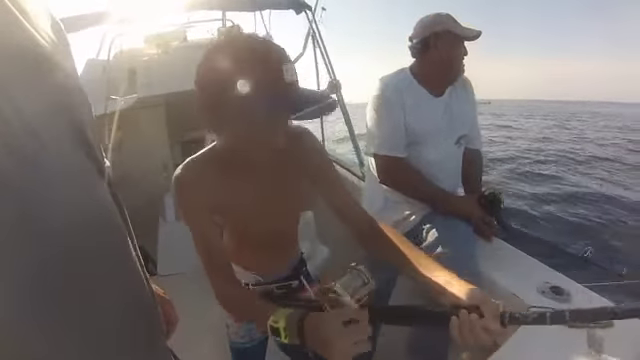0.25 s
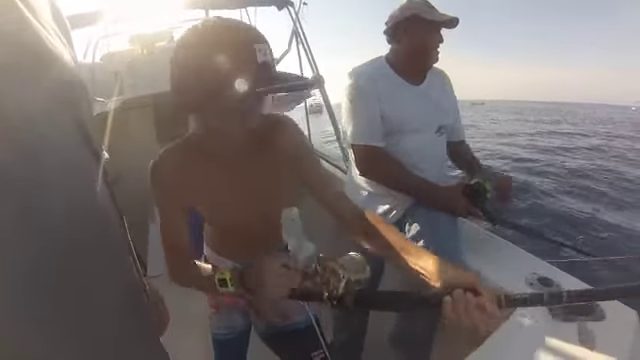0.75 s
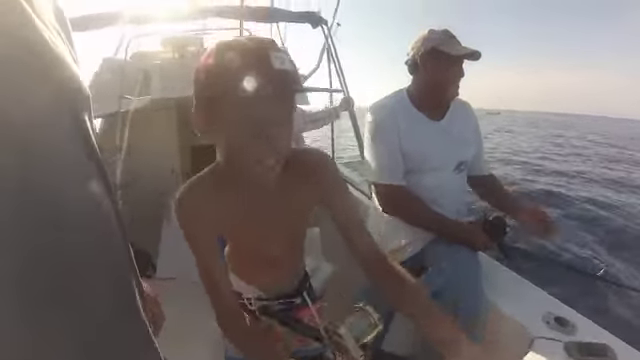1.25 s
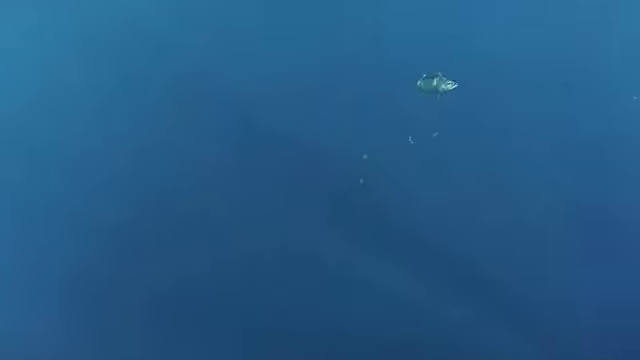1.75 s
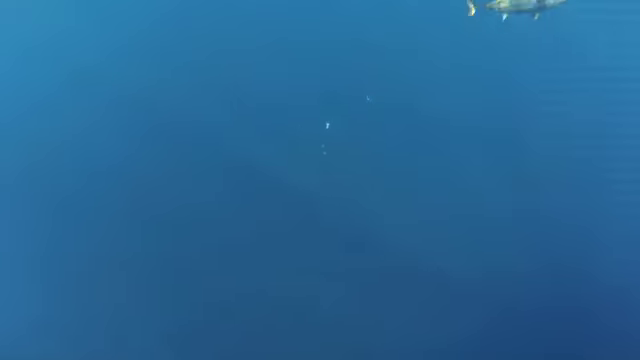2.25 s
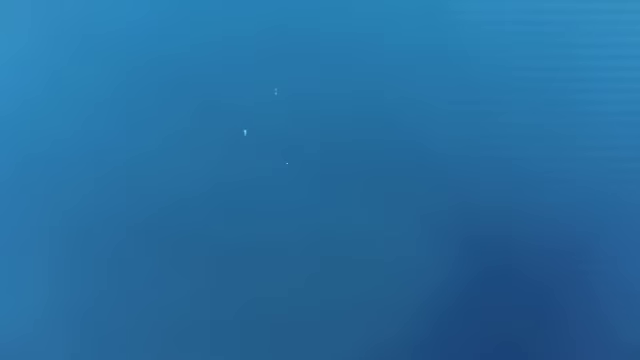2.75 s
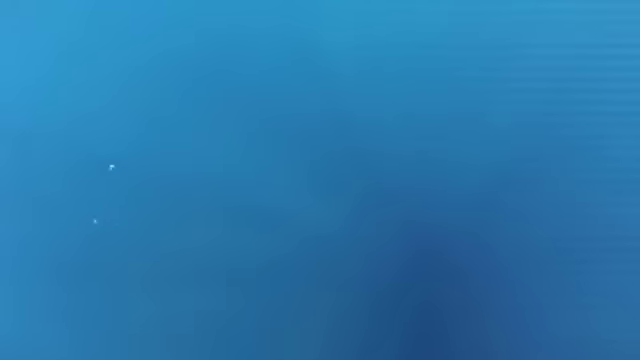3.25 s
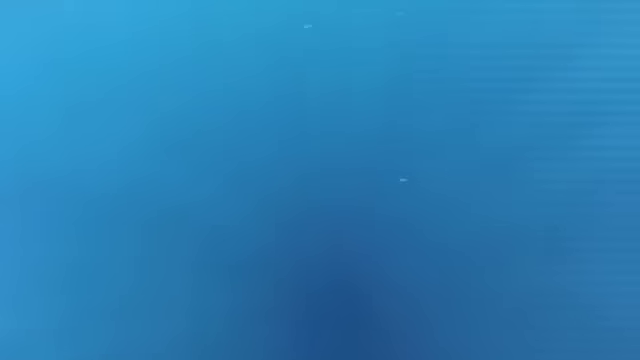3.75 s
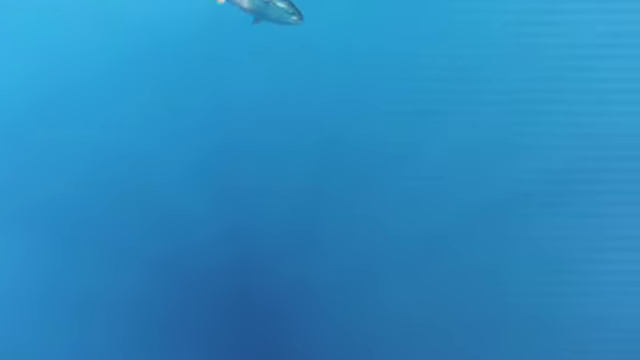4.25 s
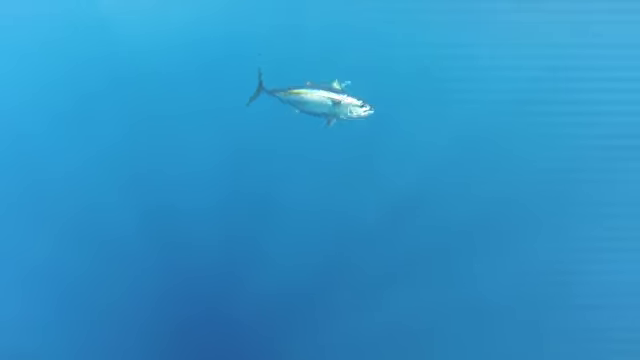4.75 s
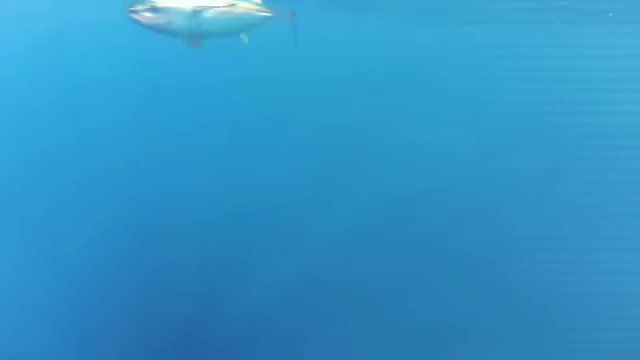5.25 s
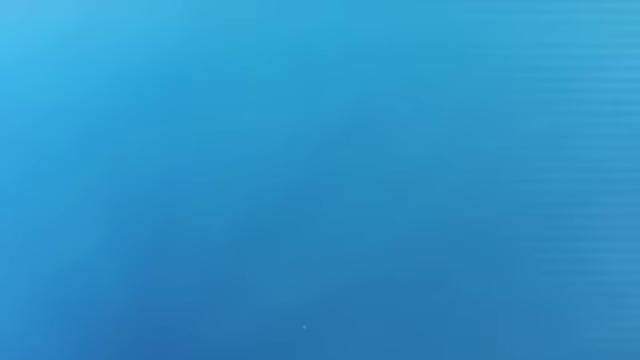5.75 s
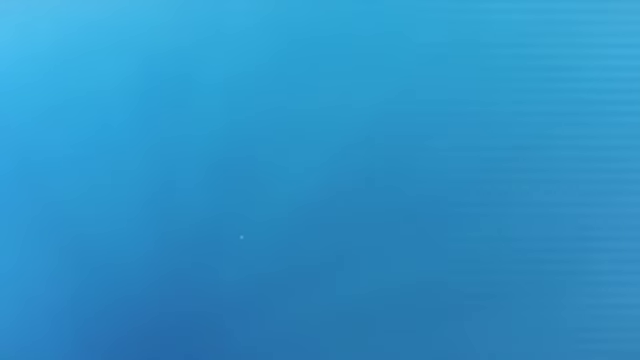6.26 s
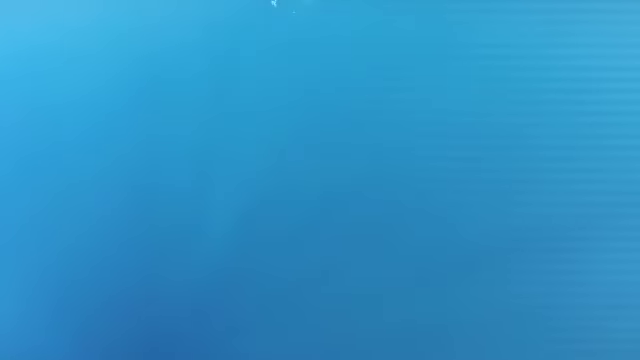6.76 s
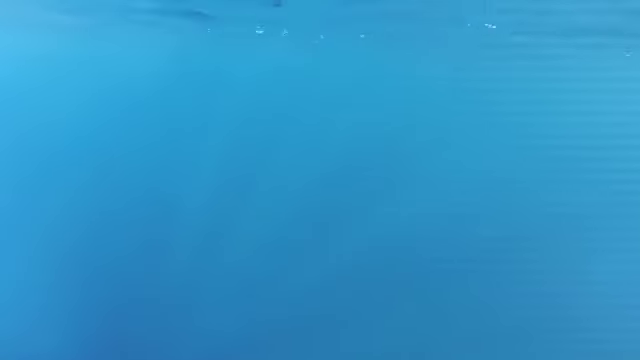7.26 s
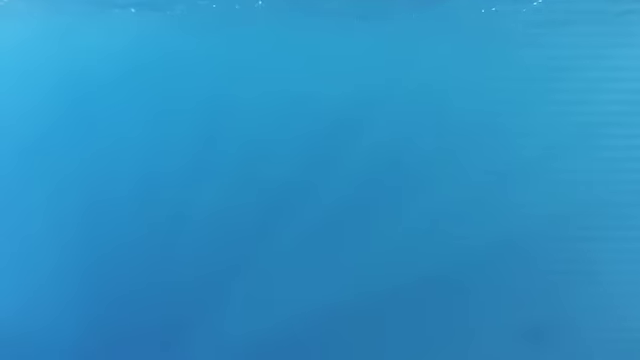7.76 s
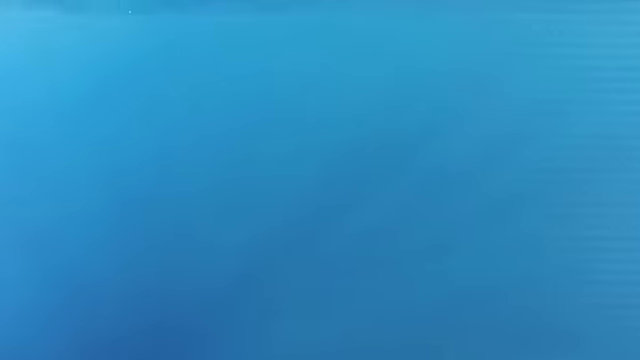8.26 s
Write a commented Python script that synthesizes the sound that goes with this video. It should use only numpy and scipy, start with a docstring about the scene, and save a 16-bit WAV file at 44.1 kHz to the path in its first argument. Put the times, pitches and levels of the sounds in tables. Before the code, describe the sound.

Underwater, a boat diesel clatters steadily through the hull while water swirls, bubbles fizz and two loud knocks jolt the camera.

```python
"""An idling diesel knocks through the hull of a fishing boat, heard by a camera in a sealed housing.
On deck the housing passes only a dull rumble, hiss and ticking; then the camera goes under water.
Blows repeated every engine cycle excite hull resonances and fade as the camera nears the surface.
Shaped noise swirls and sways past, gliding sines gurgle, and tiny pings make fizzing bubbles.
Short noise snaps click at the housing, and two bumps, of several contacts, ring the shell and mount."""
import sys
import numpy as np
from scipy import signal
from scipy.fft import rfft, irfft
from scipy.io import wavfile
from scipy.ndimage import uniform_filter1d

SR = 44100
rng = np.random.default_rng(int(sys.argv[2]) if len(sys.argv) > 2 else 0)


def to_wav(sig):
    """Store sig (one row per channel, or 1-D mono) as 16-bit WAV at the path in sys.argv[1].

    Samples outside -1..1 are clipped; the rate is SR.
    """
    pcm = np.clip(np.atleast_2d(sig), -1, 1) * 32767
    pcm = np.round(pcm).astype(np.int16)
    wavfile.write(sys.argv[1], SR, pcm.T)  # frames by channels


N = 375732
TIME = np.arange(N) / SR  # s

# the muffled deck, relative spectra: hz, level_db (per Hz)
DECK_RUMBLE_COLOUR = [(10, -27), (30, 3.5), (50, -2.5), (95, -20), (135, -19), (260, -22.5), (320, -30),
                      (540, -28), (750, -38), (1300, -31.5), (1900, -44.5), (2430, -35.5), (3100, -52),
                      (6000, -89)]
DECK_HISS_COLOUR = [(1000, 3), (3800, -0.5), (7400, -2.5), (8800, -6.5), (12600, -8), (13400, -25),
                    (15000, -35)]

# water noises, relative spectra: hz, level_db (per Hz)
RUSH_COLOUR = [(30, -5.5), (70, -3), (130, 1), (200, -2.5), (330, -6.5), (450, 2), (600, -4), (800, -10.5),
               (1050, -28.5), (2400, -33), (3200, -52.5), (6000, -65.5), (12000, -80.5)]
WASH_COLOUR = [(100, -23.5), (200, -10), (250, -3), (330, -1.5), (450, 3.5), (600, -2.5), (800, -10.5),
               (1050, -29), (2400, -34), (4000, -59.5), (12000, -84.5)]
SWAY_COLOUR = [(5, -18.5), (15, -6), (26, 2.5), (42, -6.5), (65, -15.5), (110, -32), (300, -86)]
HISS_COLOUR = [(100, -1.5), (3600, 5.5), (4800, -2.5), (6000, -7), (6700, 1.5), (7600, -5), (9500, -3),
               (12600, -2), (13200, -17), (15000, -20.5)]
# swirls of water past the housing: peak_s, deep_rush_db, hollow_churn_db, half_length_s
SWIRLS = [(1.898, -43.5, -44, .26), (2.72, -39.5, -49.5, 0.3), (3.6, -57.5, -48.5, 0.68),
          (6.268, -50, -50.5, 0.2), (7.8, -54, -67, 0.14)]
# slow surges of pressure from passing waves: peak_s, peak_db, half_length_s
SURGES = [(1.75, -44, .15), (3.95, -38, 0.078), (4.48, -38.5, .12), (5.84, -37, .1), (6.5, -44, 0.21)]
# larger bubbles gurgling off the housing: start_s, peak_db, pitch_hz, rise_hz_per_s
GURGLES = [(1.54, -29, 593, 300), (1.615, -34.5, 423, 806), (1.70, -28.5, 588, -200),
           (1.78, -34, 689, 4004), (1.885, -32, 392, 398), (2.108, -39.5, 277, 502.5),
           (2.72, -33.5, 175, -1200), (2.825, -44, 860, 4504), (2.865, -36.5, 203, 2500),
           (6.172, -49, 924, 1504)]
# clouds of tiny bubbles drifting by: peak_s, peak_db, half_length_s
CLOUDS = [(2.03, -79.5, .08), (2.33, -80, 0.098), (4.3, -84.5, .15), (5.45, -80.5, 0.22), (6.1, -78, 0.17),
          (7.9, -82.5, 0.26)]
# small clicks and bubbles at the housing: start_s, peak_db, centre_hz, width_hz
CLICKS = [(1.627, -53, 6000, 1500), (3.025, -42.5, 8600, 3500), (3.195, -41.5, 6400, 2200),
          (3.29, -41.5, 7100, 7000), (3.29, -41, 4180, 700), (3.6382, -46.5, 12300, 1800),
          (4.3047, -54.5, 7200, 2500), (4.319, -51, 3850, 500), (6.192, -50, 6560, 2500),
          (7.3901, -36, 2750, 303), (7.77, -50, 3900, 600)]

# contacts on the camera: start_s, thud_db, clack_peak_db, brightness_hz, pitch_factor (on the mount)
KNOCKS = [(2.9444, -36, 2.5, 1100, 1.8), (2.9477, -15.5, 1.5, 895, 0.97), (3.2854, -24, -6.5, 390, 2.6),
          (3.2867, -14, -13.5, 260, 0.89), (3.347, -38, -46, 200, 1.3)]
# ring of camera and pole, before each contact's pitch factor: pitch_hz, level_db, t60_s
MOUNT = [(22.4, -15.5, 0.58), (43.7, -8.5, 0.47), (102.4, 8, 0.15), (169, -10, 0.11), (217, -12, 0.25),
         (277, -35, 0.04)]
# resonances of the shell when struck: centre_hz, width_hz, relative level_db
SHELL_MODES = [(90, 190, 3), (205, 57, 9.0), (553, 250, 4.5), (933, 350, -2.5), (1530, 980, -11.5),
               (2500, 710, -22), (6000, 4600, -39)]

# resonances of the loose, buzzing housing: centre_hz, width_hz, relative level_db
BUZZ_MODES = [(2353, 150, 2), (2581, 76, -4), (3670, 330, -17)]
# blows of pistons, injectors and valves, relative levels: s_into_cycle, boom_db, clatter_db, tick_db
BLOWS = [(.0005, -39.5, -35.5, -53), (.0144, -28.5, -28.5, -55), (.0348, -37, -37, -57),
         (0.0494, -33.5, -30.5, -56), (.0700, -38, -35.5, -53), (.0790, -45, -39, -73.5),
         (.0855, -29.5, -41, -67.5), (.1000, -39.5, -39.5, -80.5), (.1078, -45, -35, -55),
         (.1160, -40, -44, -68), (.1240, -35, -43, -66.5), (.1462, -37, -37.5, -60),
         (.1630, -33.5, -35.5, -63), (.1775, -46, -39, -72), (.1832, -36, -40, -57),
         (0.1974, -27, -30.5, -62), (.2105, -41.5, -43.5, -72)]
# resonances of hull and housing: centre_hz, width_hz, relative level_db
HULL = [(241.9, 28, -13), (429.6, 62, -14.5), (535.4, 53, 1.5), (587, 59, -3.5), (673, 25, -10.5),
        (711, 31.3, -7.5), (780, 62, -28), (859, 23.3, -12.5), (924, 102, -26.5), (1154, 106, -24.5),
        (1496, 67, -3.5), (1617.4, 68, -4), (1686, 120, -8.5), (1800, 94, -16), (1912, 40, -14.5),
        (2194, 150, -26.5), (2255.3, 61, -17.5), (2600, 71, -30), (2773, 250, -29), (3130, 180, -35),
        (3260, 34, -29.5), (3466, 172, -39.5), (3720, 280, -43), (4125, 77, -49.5), (4460, 181, -59),
        (5260, 400, -54.5)]
# the idle hunts slightly around its set speed: time_s, crankshaft_rpm
SPEED = [(2.3, 552.32), (3.2, 545.36), (4.2, 555.67), (5.2, 544.53), (6.9, 553.47), (7.3, 543.67),
         (8.4, 555.88)]
# how strongly the engine reaches the camera, weakest near the surface: time_s, level_db
REACH = [(1.5, -5.5), (1.8, -1), (3.0, 0), (3.8, 2.7), (4.75, -.5), (5.15, 0), (5.55, -4.5), (5.9, -.5),
         (6.5, 2), (7.05, -6), (7.55, -6), (7.92, 2.5), (8.2, 2), (8.5, -9)]
# swells of the engine's thin ring: peak_s, peak_db, half_length_s
RING_SWELLS = [(2.3, -53, 0.58), (3.7, -50.5, 0.093), (7.25, -51.5, 0.23), (7.88, -49.5, 0.041),
               (8.45, -52.5, 0.21)]

DIVE_S = 1.478  # the camera goes under water
FLOOD_S, FIRST_WET = 0.23, 0.29  # full wetting would take FLOOD_S from dry; this share is wet at once
SEATED_S = 2.95  # the first bump seats the housing: it stops buzzing and lets the ticks through
FLOW_DB, WASH_DB = -56.5, -56  # steady flow between swirls; propeller wash before its own swell
SWAY_DB = -42  # slow pressure swings, before following the reach
SHOVE_DB, SHOVE_S = -26, .085  # their surge after a contact, and its decay
STRAY_BUBBLES_DB, FIZZ_DB = -88, -93.5
BUZZ_DB, BUZZ_RISE_S = -61.5, 0.29
FIRST_CYCLE_S = 1.3160  # the engine cycles are counted from here
TURNS_PER_CYCLE = 2  # four-stroke
RING_DB = -56  # the thin ring between its swells
LOOSE_TICK_DB = -9  # muffling of the ticks while the housing is loose
BOOM_FADE_DB_PER_S = 1  # the boom thins out as the camera drifts
CHURN_SHARE = .6  # the diffuse churn swells and fades less than the direct blows
EDGE_HZ = 15200  # upper band limit


def amp(db):
    """Decibels to gain."""
    return 10 ** (np.asarray(db) / 20)


def unit(x):
    """Scales to rms 1."""
    return x / np.sqrt(np.mean(x ** 2) + 1e-20)


def add(mix, s, sound):
    """Mixes a sound in at time s, cut off at the end of the mix."""
    part = mix[round(s * SR):][:len(sound)]
    part += sound[:len(part)]


def noise(colour):
    """Noise of rms 1, coloured along a spectrum of (Hz, dB) points."""
    hz, db = np.transpose(colour)
    bins_hz = np.fft.rfftfreq(N, 1 / SR)
    gain = amp(np.interp(np.log(bins_hz + 1), np.log(hz), db))
    return unit(irfft(rfft(rng.standard_normal(N)) * gain, N))


def flutter(per_s, depth_db):
    """A gain that wanders at random, gliding between per_s new values a second."""
    steps = rng.standard_normal(4000)
    return amp(depth_db * np.interp(TIME * per_s, np.arange(len(steps)), steps))


def swells(events, steady_db):
    """A steady gain with a smooth swell for each (s, peak dB, half length s) row."""
    power = sum(amp(db) ** 2 * np.exp(-((TIME - s) / half_s) ** 2) for s, db, half_s in events)
    return np.sqrt(amp(steady_db) ** 2 + power)


def ring(modes, size=8192):
    """Causal impulse response, of energy 1, of steep (Hz, width, dB) resonances."""
    f = abs(np.fft.fftfreq(size, 1 / SR))
    power = sum((amp(db) / (1 + (2 * (f - hz) / width) ** 2)) ** 2 for hz, width, db in modes)
    log_gain = np.log(power / power.max() + 1e-10) / 2
    # minimum phase: the resonances sound after the strike, never before it
    spectrum = np.exp(np.conj(signal.hilbert(log_gain)))
    response = np.fft.ifft(spectrum).real[:size // 2]
    return response / np.linalg.norm(response)


def fizz(per_s, spread_db, low_hz, high_hz, decay_s, count=16):
    """Tiny bubbles and droplets at random moments, each a brief ping at one of count pitches."""
    t, out = np.arange(512) / SR, np.zeros(N)
    for hz in np.geomspace(low_hz, high_hz, count):
        strikes = rng.random(N) < per_s / count / SR
        strengths = amp(spread_db * np.minimum(rng.exponential(1, N), 3))
        ping = np.sin(2 * np.pi * hz * t) * t * np.exp(-t / decay_s)
        out += signal.oaconvolve(strikes * strengths, ping)[:N]
    return unit(out)


def reach_db():
    """The rise and fall of the engine's level at the camera."""
    return np.interp(TIME, *np.transpose(REACH))


def boom_swell_db(share=1.39):
    """The bass fades most near the surface, and slowly thins out after the dive."""
    return share * reach_db() - BOOM_FADE_DB_PER_S * (TIME - DIVE_S)


def looseness(settle_s=.12):
    """1 while the housing sits loose, 0 once it is seated."""
    return np.clip(.5 + (SEATED_S - TIME) / settle_s, 0, 1)


def wetted():
    """The share of the housing that the water has reached; the boom does not wait for it."""
    return np.clip(FIRST_WET + (TIME - DIVE_S) / FLOOD_S, 0, 1)


def deck():
    """In air the housing lets through only a dull rumble, a soft hiss and faint ticking."""
    rumble = amp(-55.5) * noise(DECK_RUMBLE_COLOUR) * flutter(per_s=19, depth_db=0.1)
    hiss = amp(-79) * noise(DECK_HISS_COLOUR)
    ticking = fizz(per_s=70, spread_db=4, low_hz=3500, high_hz=8000, decay_s=.00015)
    return rumble + hiss + amp(-88) * ticking


def gurgles(swell_s):
    """Each bubble swells, rings and glides in pitch as it tears loose."""
    t, out = np.arange(SR // 6) / SR, np.zeros(N)
    shape = (t / swell_s * np.exp(1 - t / swell_s)) ** 2
    for s, db, hz, rise in GURGLES:
        add(out, s, amp(db) * shape * np.sin(2 * np.pi * (hz + rise * t / 2) * t))
    return out


def water():
    """Swirling flow, propeller wash, pressure swings that surge after contacts, faint hiss and gurgles."""
    deep = swells([(s, db, half_s) for s, db, _, half_s in SWIRLS], FLOW_DB)
    hollow = swells([(s, db, half_s) for s, _, db, half_s in SWIRLS], WASH_DB + boom_swell_db())
    rush = noise(RUSH_COLOUR) * deep * unit(flutter(per_s=45, depth_db=3.5))
    wash = noise(WASH_COLOUR) * hollow
    # where shoves overlap, the strongest counts
    shoves = [np.exp(-abs(TIME - knock[0]) / SHOVE_S) * (TIME > knock[0]) for knock in KNOCKS]
    shove = np.max(shoves, axis=0)
    sway_gain = swells(SURGES, SWAY_DB + .4 * reach_db()) + amp(SHOVE_DB) * shove
    sway = noise(SWAY_COLOUR) * sway_gain
    hiss = amp(-78.5) * noise(HISS_COLOUR) * flutter(per_s=30, depth_db=.7)
    return wetted() * (rush + wash) + sway + hiss + gurgles(swell_s=0.014)


def bubbles():
    """Dense clouds fizz softly; stray bubbles ping one by one."""
    cloud = fizz(per_s=700, spread_db=4, low_hz=6400, high_hz=8300, decay_s=.0003)
    strays = fizz(per_s=60, spread_db=5, low_hz=6300, high_hz=9300, decay_s=.0004)
    return swells(CLOUDS, FIZZ_DB) * cloud + amp(STRAY_BUBBLES_DB) * strays


def clicks(decay_s):
    """Short gritty snaps close to the microphone: decaying noise through one resonance each."""
    t, out = np.arange(1024) / SR, np.zeros(N)
    for s, db, hz, width in CLICKS:
        grit = rng.standard_normal(len(t)) * np.exp(-t / decay_s)
        snap = signal.fftconvolve(grit, ring([(hz, width, 0)]))
        add(out, s, amp(db) * snap / abs(snap).max())
    return out


def knocks():
    """Each contact clacks on the housing and sets the mount ringing; soft contacts lose the treble."""
    t, out = np.arange(SR // 2) / SR, np.zeros(N)
    shell = ring(SHELL_MODES)
    for s, thud_db, clack_db, bright_hz, pitch in KNOCKS:
        # the loosely held mount wavers in pitch as it rings
        bent_time = np.cumsum(pitch * flutter(per_s=60, depth_db=.25)[:len(t)]) / SR
        thud = sum(amp(db - 60 * t / t60) * np.sin(2 * np.pi * hz * bent_time) for hz, db, t60 in MOUNT)
        soft_onset = 1 - np.exp(-t / 0.0016)
        clack = signal.lfilter(*signal.butter(1, bright_hz, fs=SR), shell)
        add(out, s, amp(thud_db) * thud * soft_onset)
        add(out, s, -amp(clack_db) * clack / abs(clack).max())
    return out


def buzz(diesel, size=100):
    """A grainy rattle shaken by the engine; it builds up after the dive and stops once seated."""
    # the jolt is the short-term strength of the diesel's slope, averaged over size samples
    jolt = np.sqrt(abs(uniform_filter1d(np.gradient(diesel) ** 2, size)))
    shake = rng.standard_normal(N) * jolt * flutter(per_s=150, depth_db=3)
    rattle = unit(signal.oaconvolve(shake, ring(BUZZ_MODES))[:N])
    envelope = np.clip((TIME - DIVE_S) / BUZZ_RISE_S, 0, 1) * looseness()
    return amp(BUZZ_DB) * envelope * rattle


def cycle_starts():
    """The moments at which the crankshaft begins a new engine cycle."""
    cycles_per_s = np.interp(TIME, *np.transpose(SPEED)) / 60 / TURNS_PER_CYCLE
    cycles = np.cumsum(cycles_per_s * (TIME >= FIRST_CYCLE_S)) / SR
    return np.append(FIRST_CYCLE_S, TIME[1:][np.diff(np.floor(cycles)) > 0])


def engine_path(blow_db, swell_db, low_hz, high_hz, lag_s, burst_s, scatter, rattle, bed_db, uneven_db):
    """One range of hull resonances, struck by the same blows each cycle, each with a fresh rattle."""
    body = ring([mode for mode in HULL if low_hz <= mode[0] < high_hz])
    t, starts = np.arange(1024) / SR, cycle_starts()
    burst = np.exp(-t / burst_s)
    burst /= np.linalg.norm(burst)
    drive = np.zeros(N)
    for blow, db in zip(BLOWS, blow_db):
        # every blow has its own fixed route through the structure: a direct hit and scattered echoes
        route = (t == 0) + scatter * burst * rng.standard_normal(len(t))
        route /= np.linalg.norm(signal.fftconvolve(route, body))
        forces = amp(db + uneven_db * rng.standard_normal(len(starts)))
        for s, force in zip(starts, forces):
            fresh_rattle = rattle * burst * rng.standard_normal(len(t))
            add(drive, s + blow[0] + lag_s, force * (route + fresh_rattle))
    # gears and propeller churn on between the blows
    churn = amp(bed_db + CHURN_SHARE * swell_db) * rng.standard_normal(N)
    excitation = (unit(drive) * amp(swell_db) + churn) * (TIME > FIRST_CYCLE_S)
    return unit(signal.oaconvolve(excitation, body)[:N])


def engine():
    """The diesel: hollow boom, woody rap, metallic clatter, thin ring, sharp valve ticks, fine sizzle."""
    _, boom_db, clatter_db, tick_db = np.transpose(BLOWS)
    reach, muffle_db = reach_db(), LOOSE_TICK_DB * looseness()
    # characters of the blows: burst decay, echoes, fresh rattle, churn level, unevenness between cycles
    heavy = dict(burst_s=.004, scatter=.55, rattle=.5, bed_db=-14, uneven_db=1.2)
    crisp = dict(burst_s=.0031, scatter=.48, rattle=.52, bed_db=-11.5, uneven_db=1.2)
    loose = dict(burst_s=.0036, scatter=.5, rattle=.8, bed_db=-7, uneven_db=1.2)
    snappy = dict(burst_s=.003, scatter=.7, rattle=.8, bed_db=-10.5, uneven_db=1.2)
    boom = engine_path(boom_db, boom_swell_db(), low_hz=0, high_hz=780, lag_s=0.002506, **heavy)
    rap = engine_path(0.7 * boom_db, 0.49 * boom_swell_db(), low_hz=780, high_hz=1300, lag_s=.0012, **loose)
    clatter = engine_path(clatter_db, reach, low_hz=1300, high_hz=2000, lag_s=0, **crisp)
    ticks = engine_path(tick_db, 1.3 * reach + muffle_db, low_hz=2500, high_hz=3900, lag_s=0, **snappy)
    # ring and sizzle answer to heavy and sharp blows alike
    both_db = 0.35 * clatter_db + 0.24 * tick_db
    thin = engine_path(both_db, 0, low_hz=2000, high_hz=2500, lag_s=-.0012, **loose)
    thin_ring = thin * swells(RING_SWELLS, RING_DB)
    sizzle_swell_db = .75 * reach + 0.45 * muffle_db
    sizzle = engine_path(both_db, sizzle_swell_db, low_hz=3900, high_hz=8000, lag_s=0, **loose)
    body = amp(-55.0) * rap + amp(-45.0) * clatter + thin_ring
    treble = amp(-65.0) * ticks + amp(-82) * sizzle
    return amp(-39.5) * boom + wetted() * (body + treble)


def scene():
    """Deck first, then the sea closes round the camera."""
    in_air = np.clip((DIVE_S - TIME) / 0.1, 0, 1)
    submerged = np.clip((TIME - DIVE_S) / 0.034, 0, 1)
    diesel = engine()
    sea = diesel + buzz(diesel) + water() + bubbles() + knocks() + clicks(decay_s=0.0011)
    return (in_air * deck() + submerged * sea)[None]


def record(dry):
    """Peaks beyond full scale are clipped, as in the hardest knocks; then a low-pass limits the band."""
    low_pass = signal.firwin(511, EDGE_HZ, window=("kaiser", 9), fs=SR)
    return signal.oaconvolve(np.clip(dry, -1, 1), low_pass[None], "same")


dry = scene()
out = record(dry)
to_wav(out)
```